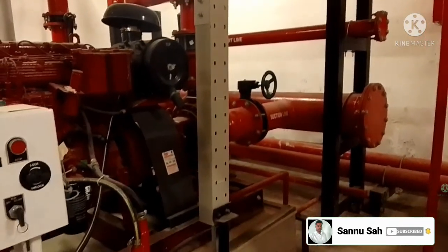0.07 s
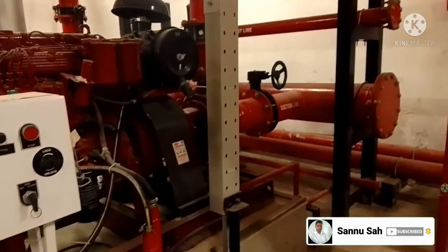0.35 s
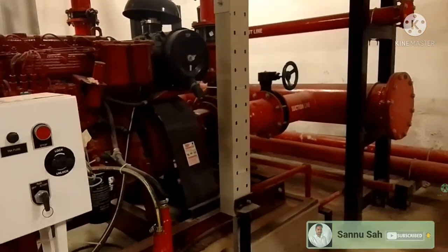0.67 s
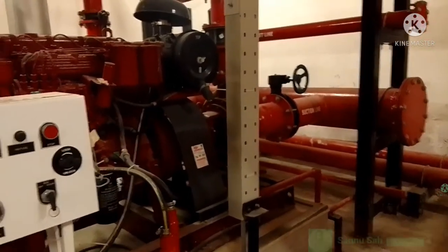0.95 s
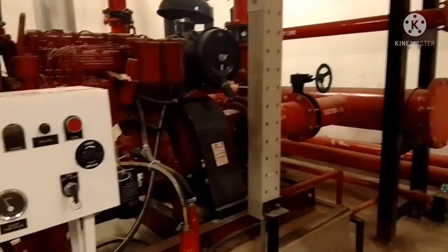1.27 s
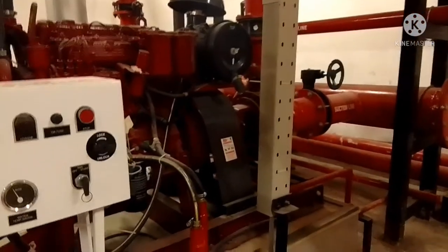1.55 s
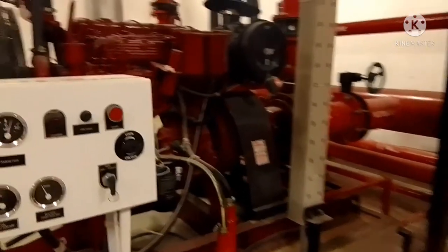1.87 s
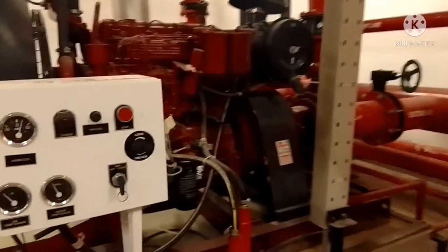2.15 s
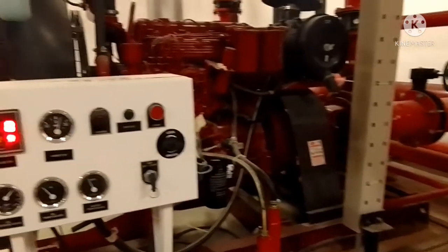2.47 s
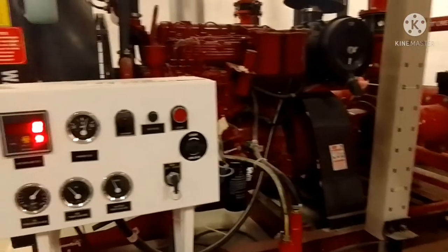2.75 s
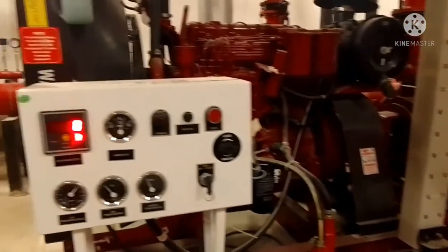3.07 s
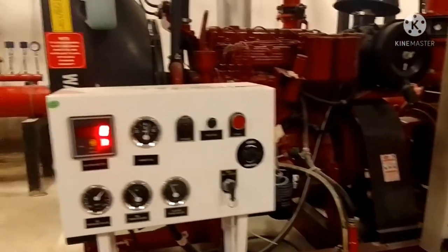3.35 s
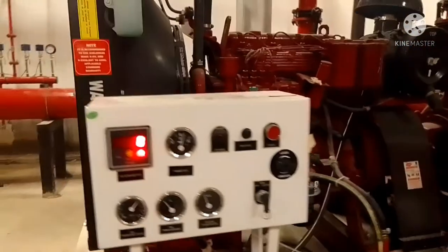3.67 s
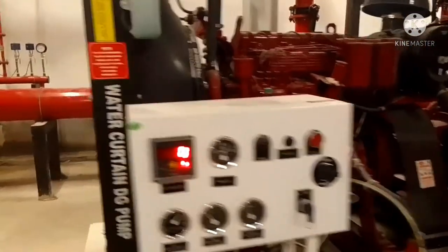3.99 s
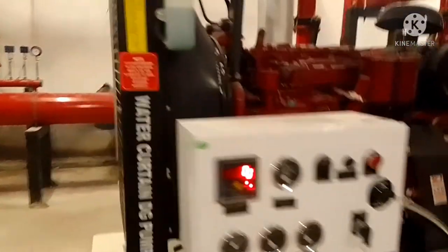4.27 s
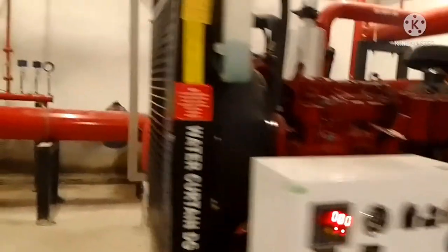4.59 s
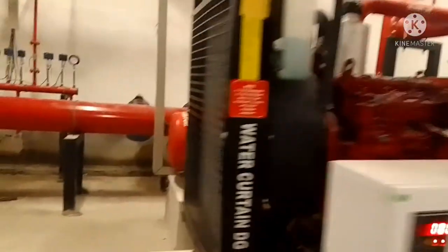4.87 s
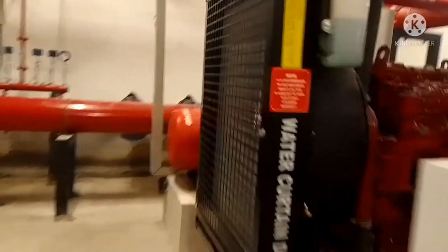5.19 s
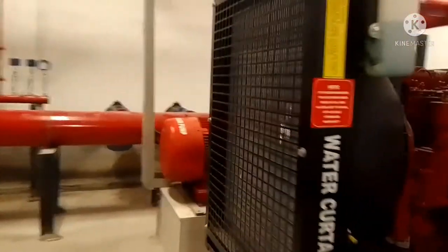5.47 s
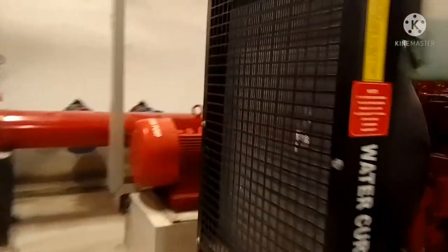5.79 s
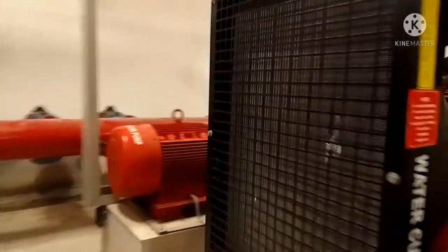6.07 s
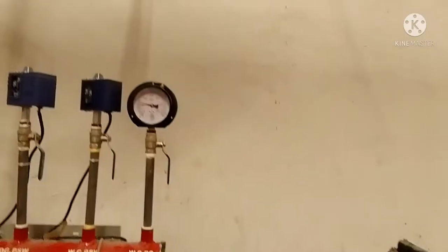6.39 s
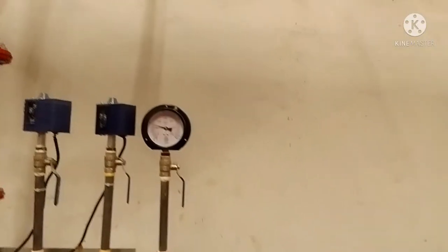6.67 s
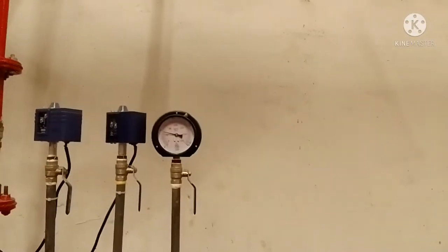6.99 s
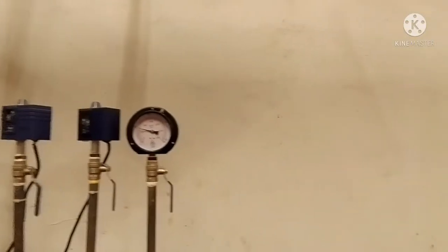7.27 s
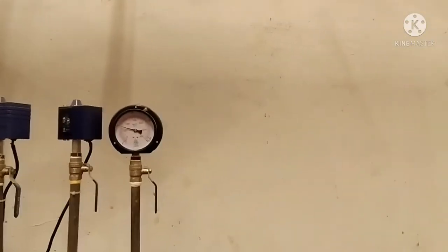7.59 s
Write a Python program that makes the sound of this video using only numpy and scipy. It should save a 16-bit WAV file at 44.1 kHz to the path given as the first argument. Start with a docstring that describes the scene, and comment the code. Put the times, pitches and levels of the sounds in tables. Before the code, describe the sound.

Loud, steady diesel clatter, exhaust hum and rushing fan air fill a pump room, fade to a short silence, then cut back in.

```python
"""A four-cylinder diesel drives a water pump at steady speed in a hard-walled pump room.
From the start, knocks excite the block and the room, the exhaust hums, and the radiator fan's drone
beats against the engine amid rushing air, loud enough to overload the microphone.
The microphone walks from the engine and reaches the radiator at 4.8 s. At 6.3 s the sound fades out;
near 7 s it cuts back in by the wall, the engine running slightly faster."""
import sys
import numpy as np
from scipy import signal
from scipy.fft import rfft, irfft, next_fast_len
from scipy.io import wavfile

SR = 44100
rng = np.random.default_rng(int(sys.argv[2]) if len(sys.argv) > 2 else 0)


def put_to_file(sound):
    """Save the sound as 16-bit audio at rate SR, in the file named by the first command-line argument."""
    columns = np.atleast_2d(sound).T  # one column per channel
    safe = np.clip(columns, -1, 1)
    whole_steps = np.round(safe * 32767)
    wavfile.write(sys.argv[1], SR, whole_steps.astype(np.int16))


N = 341334
TIME = np.arange(N) / SR
CYCLE_HZ, LATER_CYCLE_HZ = 17.52, 17.72   # four-stroke cycle rate before and after the silence
ROOM_T60_S, CUTOFF_HZ = 0.93, 15600
BODY_LOSS_DB = 7.5   # lost with each place further from the engine
THROB_MULTIPLE, IN_STEP_S = 17, 2.38   # harmonic that beats with the fan; a time they are in phase
FADE_S, SILENT_S, RESUME_S, SNAP_S = 6.30, 6.452, 6.9785, .0015

# path of the microphone: t/s, place (0 engine, 1 radiator, 2 wall)
WALK = [(0, 0), (1.3, 0), (2.2, .3), (4.2, .4), (4.8, 1), (6.5, 1), (6.9, 2), (7.74, 2)]
# spectra of the knocks and of the block's resonance: f/Hz, relative level/dB
KNOCK_SPECTRUM = [(150, -11.5), (400, 0), (700, -1), (1000, -9), (1300, 1.5), (1650, 2), (2300, -1),
                  (3100, -10.5), (4200, -18.5), (5200, -20), (7500, -26), (10000, -45.5)]
RING_SPECTRUM = [(850, -33.5), (1100, -3.5), (1260, 6.5), (1400, 3), (1540, -6), (2000, -40)]
# screening of the knocks as the radiator comes between engine and microphone: t/s, gain/dB
SCREENING = [(5.4, 3), (6.0, -1.5), (6.4, -0.5), (6.9, 1)]
# exhaust harmonics: multiple of the cycle rate, level/dB at engine, radiator, wall
EXHAUST_HARMONICS = [(4, -36, -34.5, -32), (8, -31.5, -39, -29.5), (12, -37, -25.5, -25),
                     (16, -30, -27.5, -40), (32, -29.5, -30, -25.5)]
# vibration of the engine body: multiple of the cycle rate, level/dB at the engine
BODY_HARMONICS = [(5, -38), (9, -26.5), (10, -32.5), (19, -26.5), (22, -30.5), (23, -27.5), (24, -28),
                  (27, -40.5), (38, -35.5), (44, -31.5), (64, -29), (71, -36), (76, -39), (80, -30),
                  (95, -30), (118, -32.5)]
# lead of the blade tone over the throb harmonic: t/s, beat f/Hz
BEAT_RATE = [(0, 1.93), (1.9, 1.97), (2.6, 2.27), (6.3, 2.3), (7, 1.8)]
# blade tone and its octave along the walk through the room's standing waves: t/s, level/dB
BLADE_LEVEL = [(0, -30.5), (0.7, -26), (1.45, -27), (1.85, -20.5), (3.0, -21.5), (3.55, -17), (3.95, -21),
               (4.33, -14.5), (4.8, -20), (5.05, -21.5), (5.33, -32.5), (5.62, -13.5), (6.1, -13),
               (6.3, -19), (7.4, -16.5), (7.74, -36)]
OCTAVE_LEVEL = [(0, -40), (2.1, -37.5), (2.4, -19.5), (2.8, -25.5), (3.9, -30.5), (4.3, -19), (4.7, -21),
                (5.3, -35), (5.8, -20), (6.3, -27.5), (7, -15), (7.4, -20.5)]
# higher fan harmonics: multiple of the blade rate, level/dB at engine, radiator, wall
FAN_HARMONICS = [(3, -27, -28, -25), (4, -27, -29, -21), (5, -32, -29.5, -29.5), (6, -33, -44.5, -45)]
# spectra of the low rumble, the fan's roar and the radiator's rush: f/Hz, relative level/dB
RUMBLE_SPECTRUM = [(20, -35), (48, -18), (125, -8.5), (170, -5), (230, 1), (285, 2), (360, -5.5), (590, -9),
                   (1000, -25), (4000, -50.5)]
ROAR_SPECTRUM = [(250, -24.5), (450, -3), (620, -0.5), (850, -4.5), (1100, -2.5), (1600, -7), (4000, -42.5)]
RUSH_SPECTRUM = [(200, -18.5), (600, -6.5), (1280, 1), (1700, -3), (2400, -6), (3200, -10), (4200, -12),
                 (5200, -19), (6500, -17.5), (7200, -16.5), (8400, -20), (9800, -34.5), (15500, -37)]
# strength of each layer (knocks before screening): level/dB at engine, radiator, wall
KNOCK_DB = (-17.5, -18, -16.5)
RING_DB = (-18, -17.5, -20)
THROB_DB = (-24.5, -27.5, -38)
RUMBLE_DB = (-20, -18.5, -19)
ROAR_DB = (-18, -19.5, -21.5)
RUSH_DB = (-16.5, -16, -17)


def from_db(db):
    """Amplitude ratio: tenfold for every 20 dB."""
    return 10 ** (np.asarray(db) / 20)


def rms_one(x):
    """Normalisation to unit power."""
    return x / np.sqrt(np.mean(x ** 2) + 1e-20)


def in_time(curve):
    """Linear interpolation of a curve at every sample."""
    return np.interp(TIME, *np.transpose(curve))


def at_place(place, levels_db):
    """Linear interpolation of level between the places of the walk."""
    return np.interp(place, np.arange(len(levels_db)), levels_db)


def drift(rate_hz):
    """Random fluctuation: noise of unit rms, low-passed near rate_hz."""
    step, settle = 100, 2000   # samples per point; points dropped while the filter settles
    pole = np.exp(-2 * np.pi * rate_hz * step / SR)
    noise = rng.standard_normal(N // step + settle + 2)
    slow = signal.lfilter([1], [1, -2 * pole, pole * pole], noise)[settle:]
    return np.interp(np.arange(N) / step, np.arange(len(slow)), rms_one(slow))


def colour(x, spectrum):
    """Filtering by a spectral envelope, with the result at unit power."""
    hz, db = np.transpose(spectrum)
    size = next_fast_len(N)
    bin_hz = np.maximum(np.fft.rfftfreq(size, 1 / SR), 1)
    gain = from_db(np.interp(np.log(bin_hz), np.log(hz), db))
    return rms_one(irfft(rfft(x, size) * gain, size)[:N])


def knock_response(direct_t60_s, room_db):
    """Impulse response: a crack of cast iron decays exponentially into the room's reverberation."""
    t = TIME[:SR // 2]
    crack = from_db(-60 * t / direct_t60_s)
    echoes = from_db(room_db - 60 * t / ROOM_T60_S)
    return np.maximum(crack, echoes) * rng.standard_normal(len(t))


def clatter(cycles, jitter_s, uneven_db, cylinders=4):
    """Convolution: each cylinder's slightly uneven impulses, one a cycle, excite its own response."""
    out = np.zeros(N)
    for cylinder in range(cylinders):
        fired = np.flatnonzero(np.diff(np.floor(cycles - cylinder / cylinders)))
        late, strength = rng.standard_normal((len(fired), 2)).T
        onsets = np.clip(fired + np.round(late * jitter_s * SR).astype(int), 0, N - 1)
        impulses = np.zeros(N)
        impulses[onsets] = from_db(uneven_db * strength)
        # one echo pattern slowly turns into another as the microphone moves
        turn = 0.791 * TIME + 0.59 * drift(1.2) + rng.uniform(0, 2 * np.pi)
        for share in (np.cos(turn), np.sin(turn)):
            response = knock_response(direct_t60_s=0.033, room_db=-8.5)
            out += share * signal.oaconvolve(impulses, response)[:N]
    return out


def engine_knocks(cycles, place):
    """Impact excitation: firing gives broadband knocks and rings the block's resonance."""
    knock_db = at_place(place, KNOCK_DB) + in_time(SCREENING)
    knocks = colour(clatter(cycles, jitter_s=.00005, uneven_db=2.4), KNOCK_SPECTRUM)
    ring_db = at_place(place, RING_DB) + 0.2 * drift(3.3)
    ring = colour(clatter(cycles, jitter_s=.00006, uneven_db=1.5), RING_SPECTRUM)
    return from_db(knock_db) * knocks + from_db(ring_db) * ring


def tone(turns, level_db, waver):
    """Interference: reflections make a sinusoid of given rms level waver in amplitude and phase."""
    angle = 2 * np.pi * turns
    wave = (1 + waver * drift(0.94)) * np.cos(angle) + waver * drift(0.71) * np.sin(angle)
    return from_db(level_db) * wave * np.sqrt(2 / (1 + 2 * waver ** 2))


def harmonics(turns, table, place, waver):
    """Fourier series: periodic motion sounds at whole multiples of its rate."""
    return sum(tone(round(k) * turns + rng.random(), at_place(place, db), waver) for k, *db in table)


def engine_hum(cycles, place):
    """Periodic radiation: the exhaust fills the room; the body's hum falls away with distance."""
    exhaust = harmonics(cycles, EXHAUST_HARMONICS, place, waver=0.12)
    body = from_db(-BODY_LOSS_DB * place) * harmonics(cycles, BODY_HARMONICS, place, waver=.2)
    throb = tone(THROB_MULTIPLE * cycles, at_place(place, THROB_DB), waver=0.045)
    return exhaust + body + throb


def fan_drone(cycles, place):
    """Beats: the blade-passing tone lies about 2 Hz above an engine harmonic, so their sum throbs."""
    beats = np.cumsum(in_time(BEAT_RATE)) / SR
    blades = THROB_MULTIPLE * cycles + beats - np.interp(IN_STEP_S, TIME, beats)
    fundamental = tone(blades, in_time(BLADE_LEVEL), waver=0.04)
    octave = tone(2 * blades, in_time(OCTAVE_LEVEL), waver=0.15)
    return fundamental + octave + harmonics(blades, FAN_HARMONICS, place, waver=0.22)


def airflow(spectrum, level_db, gust_db, gust_hz):
    """Turbulence: air driven by the fan radiates broadband noise of slightly unsteady level."""
    noise = colour(rng.standard_normal(N), spectrum)
    return noise * from_db(level_db + gust_db * drift(gust_hz))


def scene():
    """Superposition: one crankshaft times knocks, hum and belt-driven fan; air noise adds to them."""
    place = in_time(WALK)
    later = TIME > (SILENT_S + RESUME_S) / 2
    hunting = 1 + .0007 * drift(4)   # the governor hunts a little
    cycles = np.cumsum(np.where(later, LATER_CYCLE_HZ, CYCLE_HZ) * hunting) / SR
    knocks = engine_knocks(cycles, place)
    rumble = airflow(RUMBLE_SPECTRUM, at_place(place, RUMBLE_DB), gust_db=.5, gust_hz=9.4)
    roar = airflow(ROAR_SPECTRUM, at_place(place, ROAR_DB), gust_db=0.8, gust_hz=7.8)
    rush = airflow(RUSH_SPECTRUM, at_place(place, RUSH_DB), gust_db=0.08, gust_hz=7.3)
    mix = knocks + engine_hum(cycles, place) + fan_drone(cycles, place) + rumble + roar + rush
    return np.tile(mix, (2, 1))


def limiter(x, top, release_db_per_s):
    """Peak limiting: a peak over the top lowers the gain at once; it recovers within milliseconds."""
    over_db = 20 * np.log10(np.maximum(np.abs(x).max(axis=0) / top, 1))
    ramp = release_db_per_s * TIME
    return x * from_db(ramp - np.maximum.accumulate(over_db + ramp))


def overload(x, top, order=8):
    """Saturation: peaks are rounded off just under the top."""
    return x / (1 + np.abs(x / top) ** order) ** (1 / order)


def fader():
    """Amplitude envelope: the gain falls, stays at zero for half a second and snaps back."""
    fade_out = np.interp(TIME, [FADE_S, 6.35, 6.42, SILENT_S], [0.98, 0.51, 0.33, 0])
    return fade_out + np.clip((TIME - RESUME_S) / SNAP_S, 0, 1)


def record(dry):
    """Nonlinear distortion in one microphone on both channels, then the fade and a steep low-pass."""
    limited = limiter(dry, top=0.88, release_db_per_s=249)
    faded = overload(limited, top=0.75) * fader()
    low_pass = signal.ellip(10, .05, 70, CUTOFF_HZ, fs=SR, output="sos")
    return signal.sosfiltfilt(low_pass, faded)


dry = scene()
out = record(dry)
put_to_file(out)
```